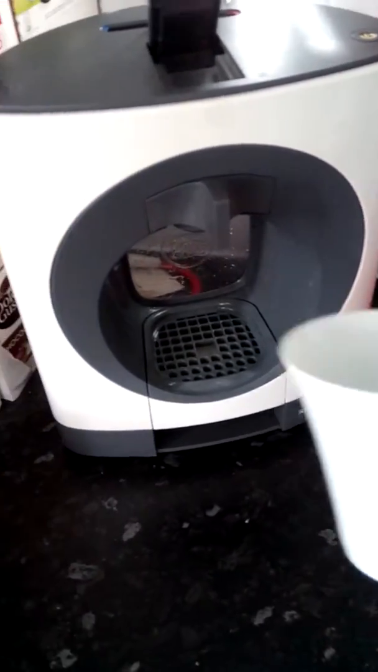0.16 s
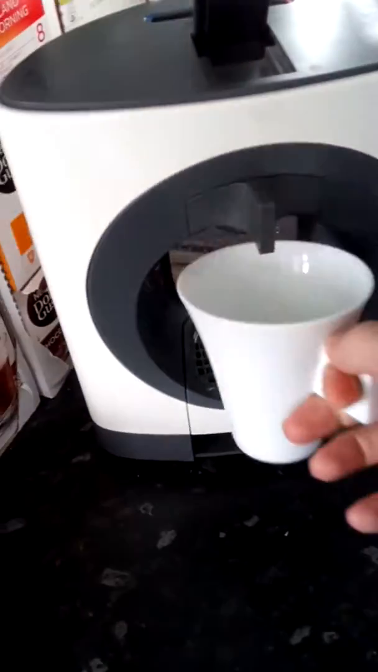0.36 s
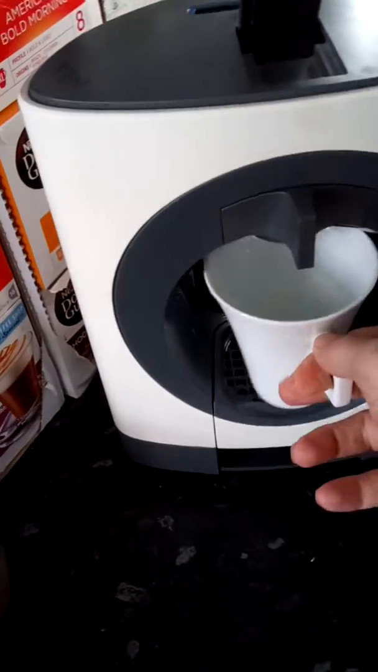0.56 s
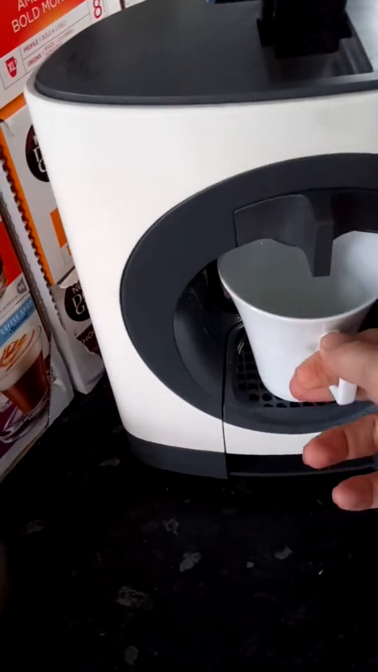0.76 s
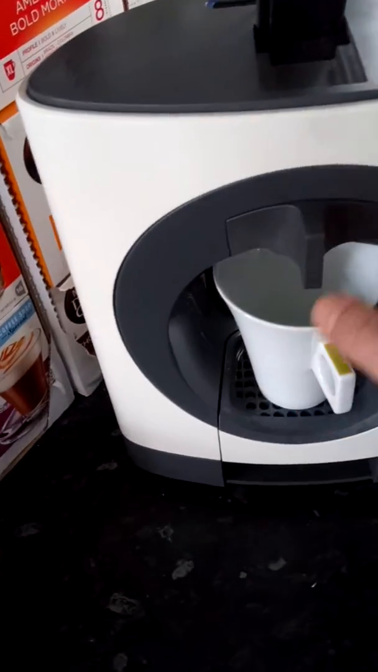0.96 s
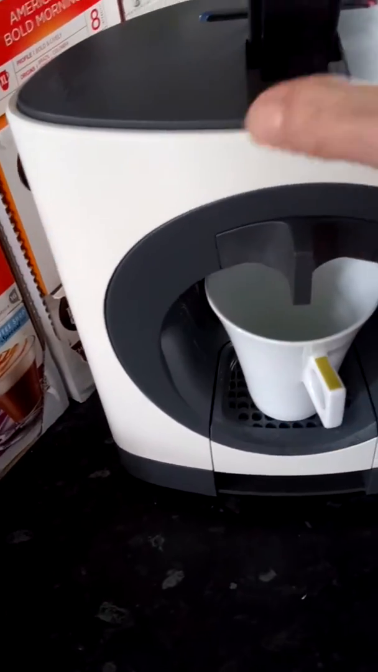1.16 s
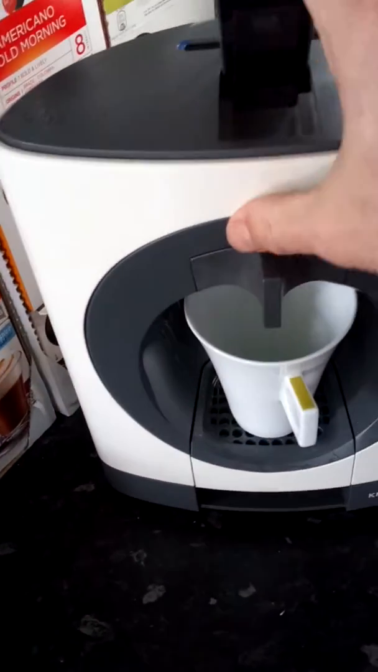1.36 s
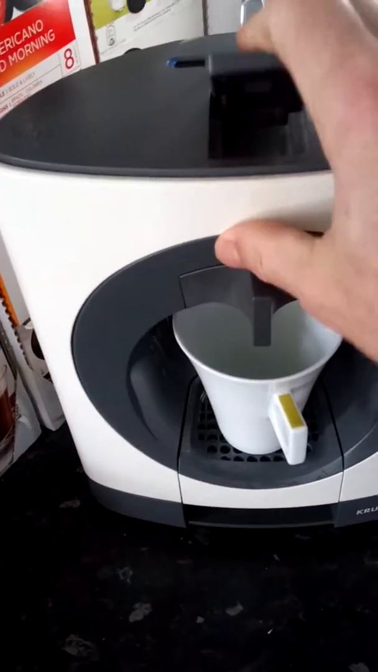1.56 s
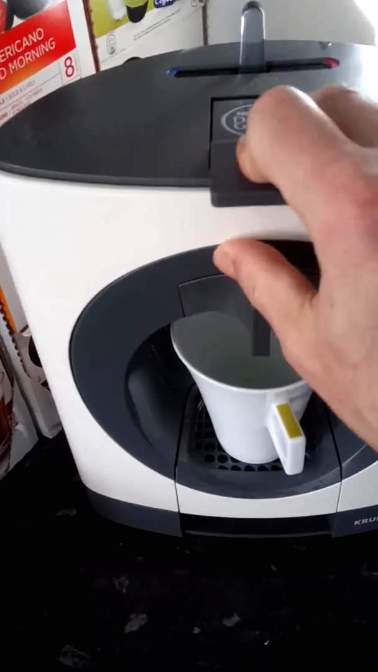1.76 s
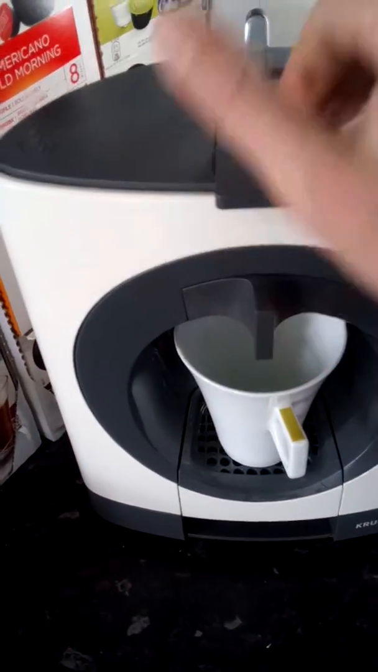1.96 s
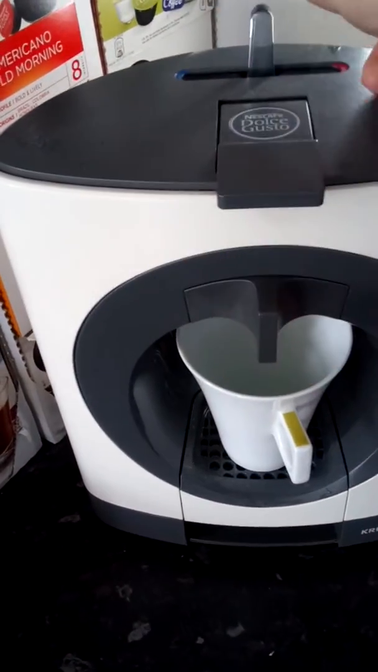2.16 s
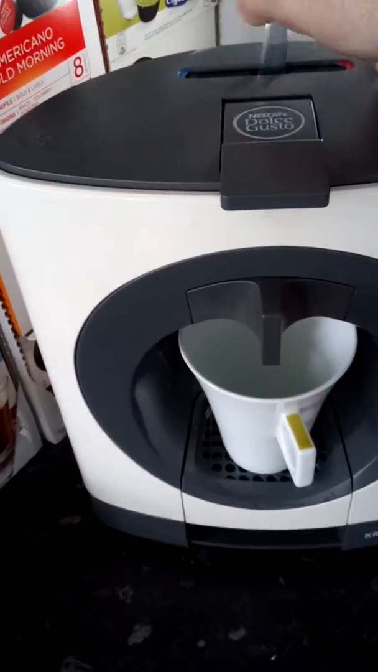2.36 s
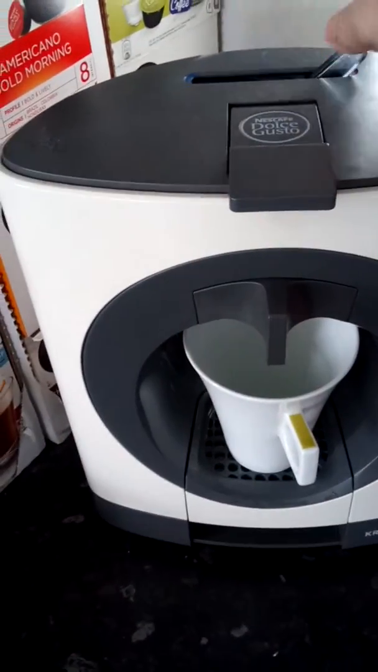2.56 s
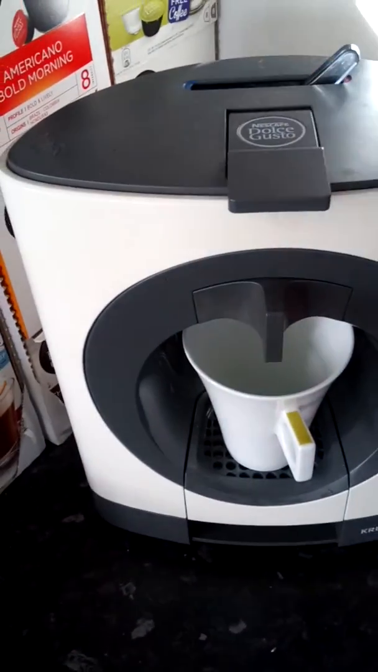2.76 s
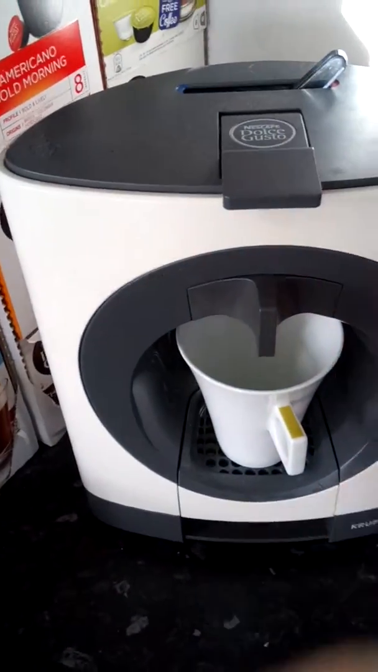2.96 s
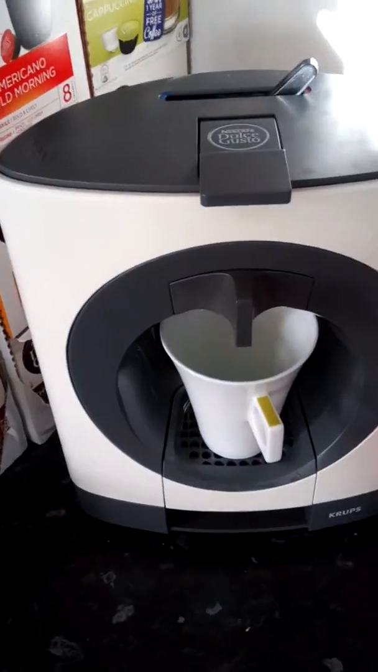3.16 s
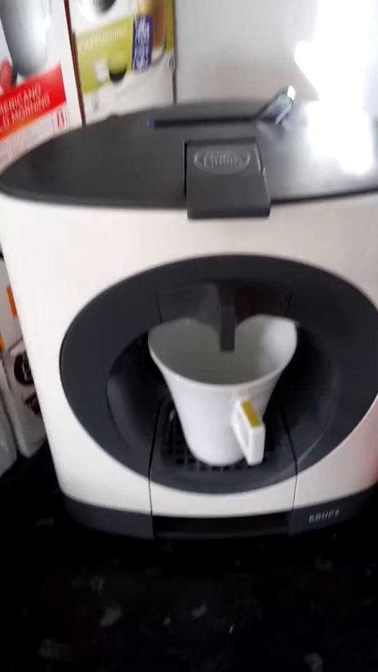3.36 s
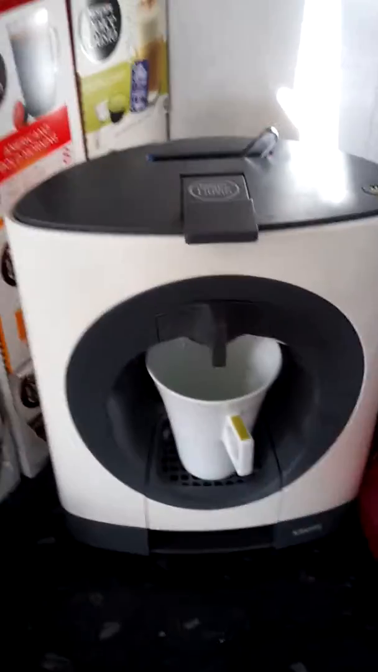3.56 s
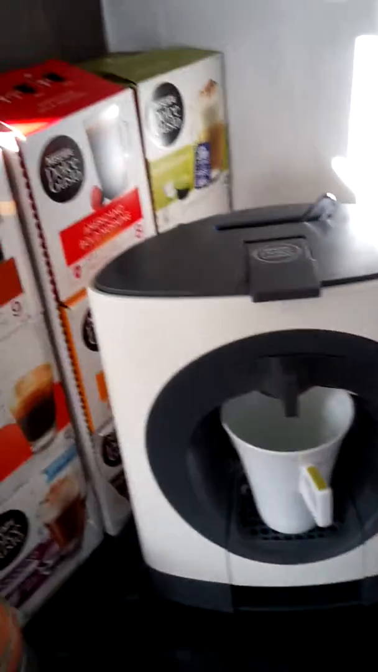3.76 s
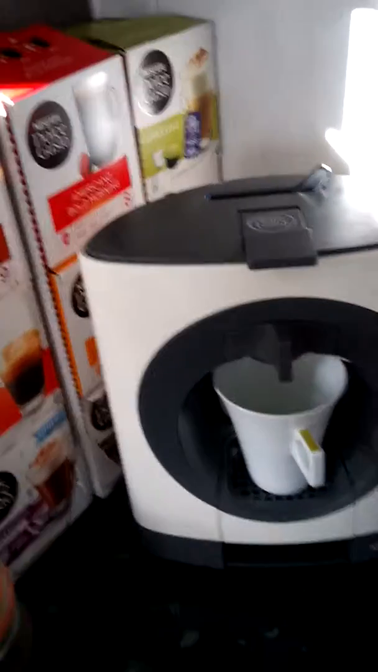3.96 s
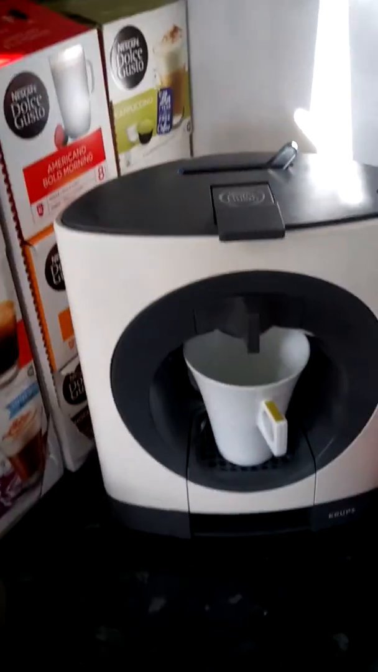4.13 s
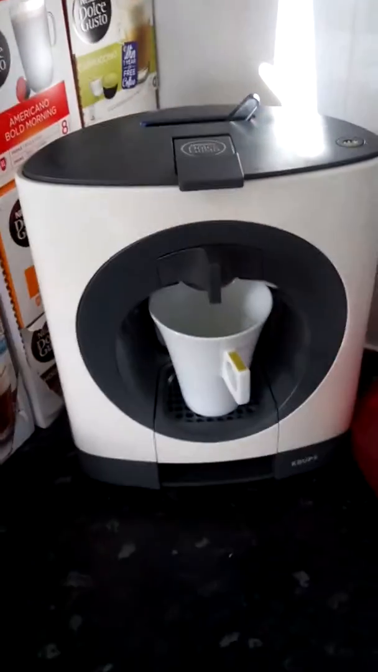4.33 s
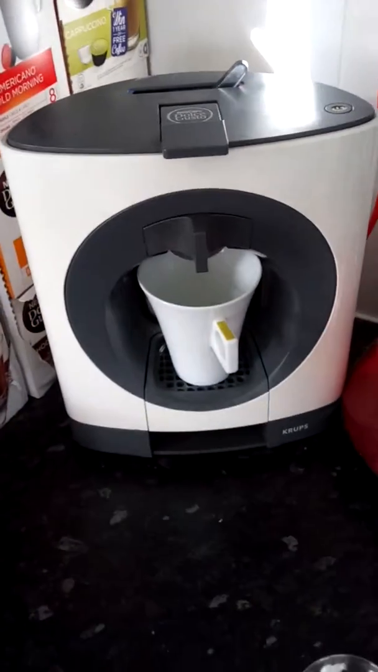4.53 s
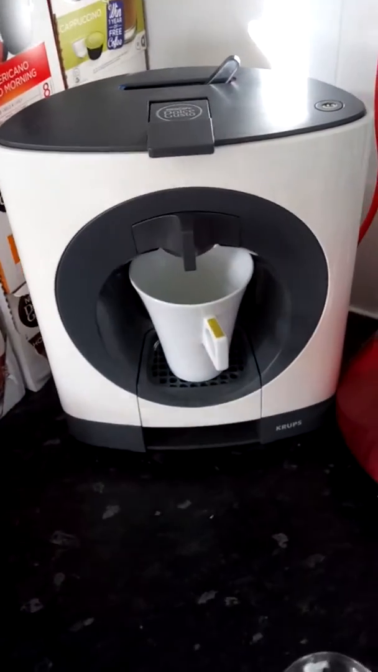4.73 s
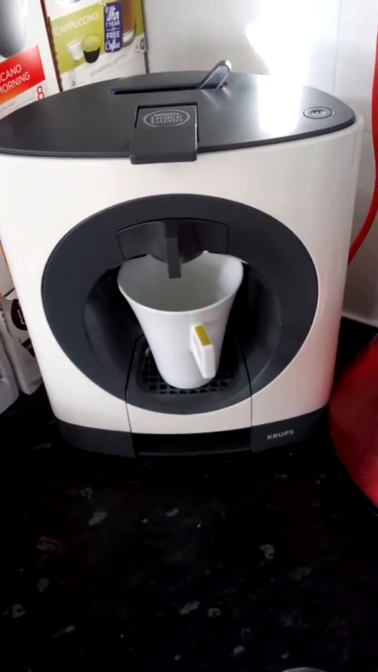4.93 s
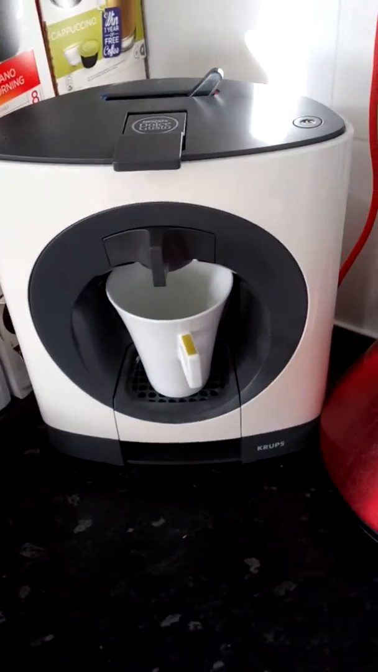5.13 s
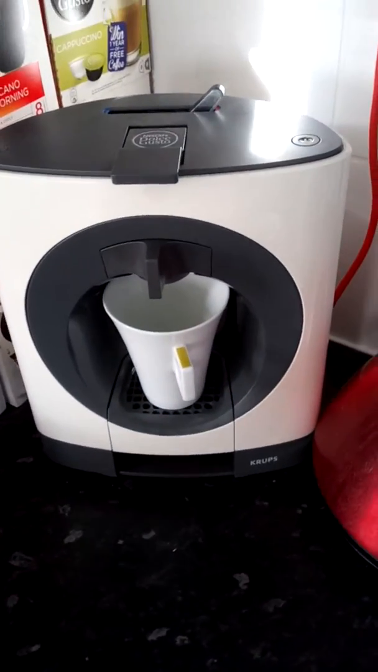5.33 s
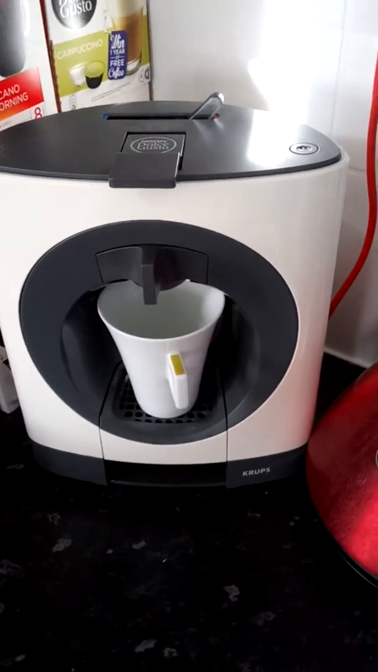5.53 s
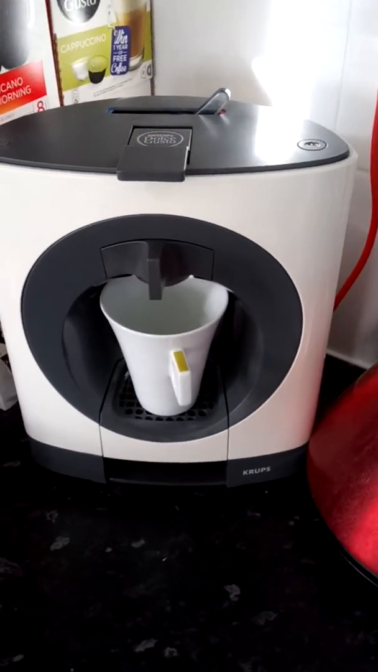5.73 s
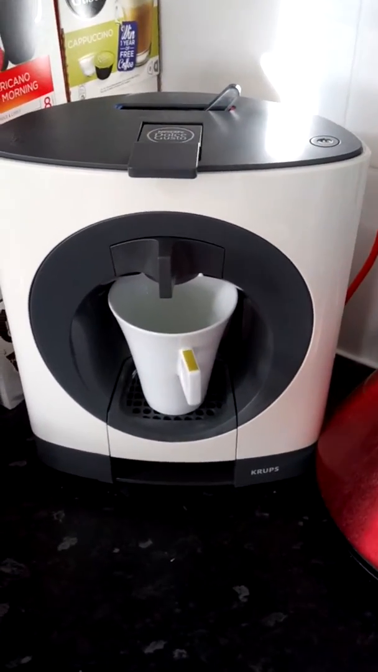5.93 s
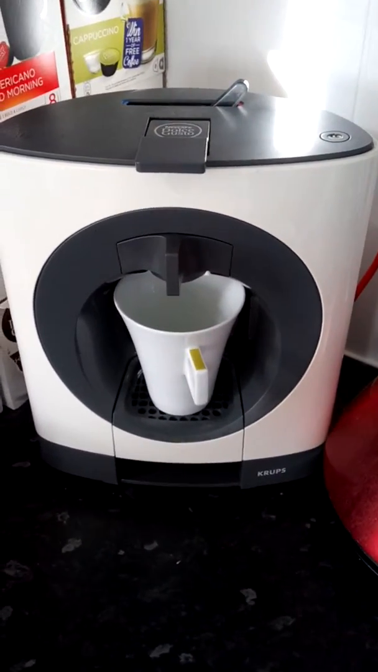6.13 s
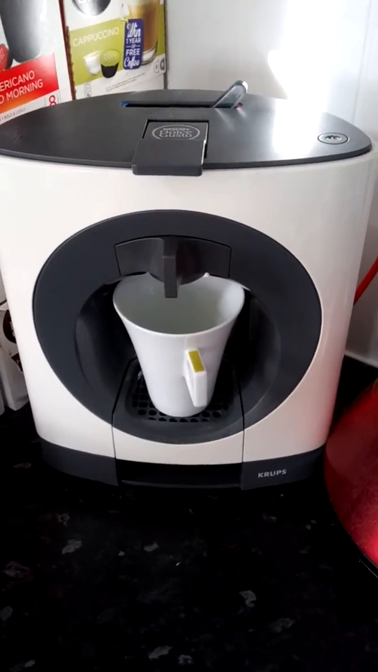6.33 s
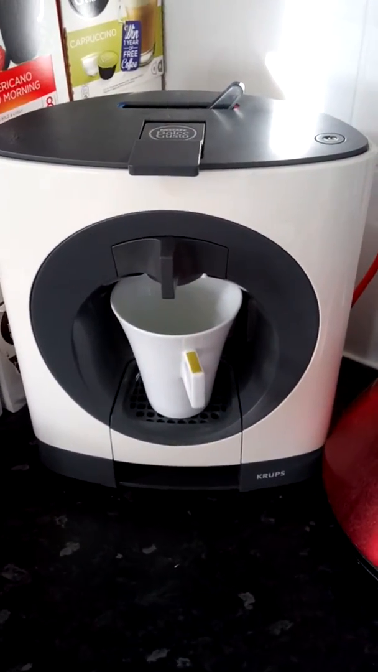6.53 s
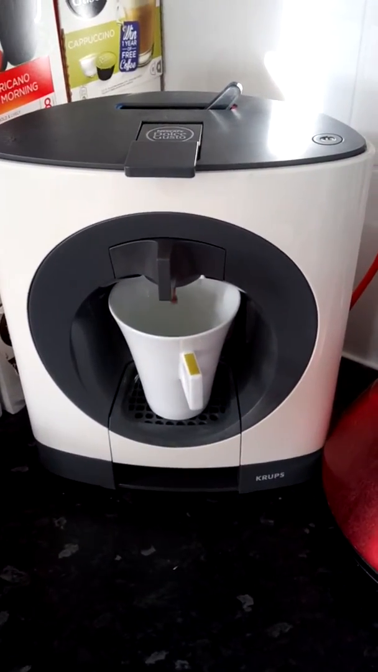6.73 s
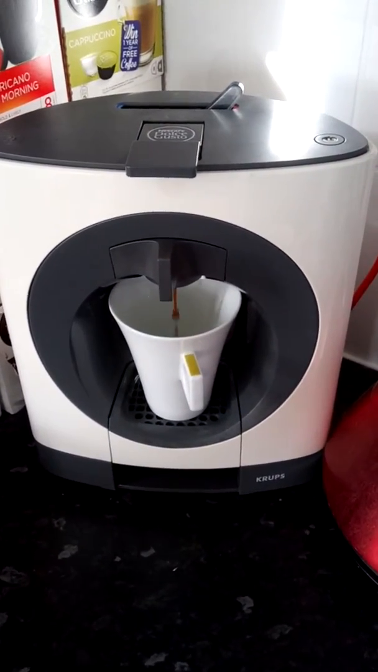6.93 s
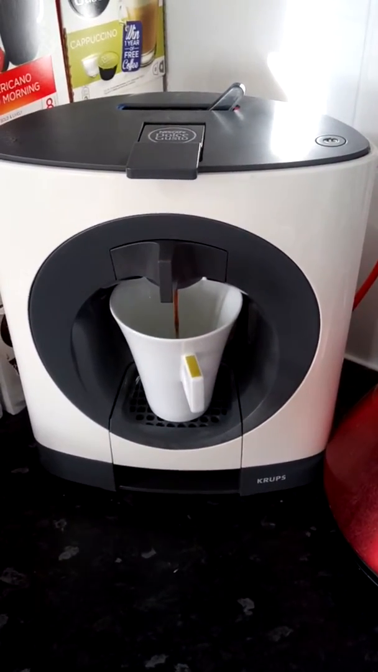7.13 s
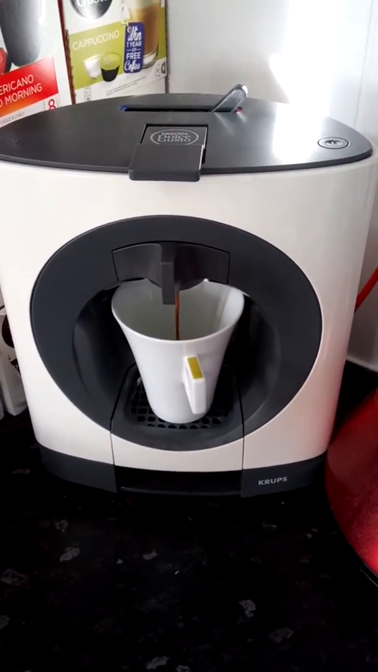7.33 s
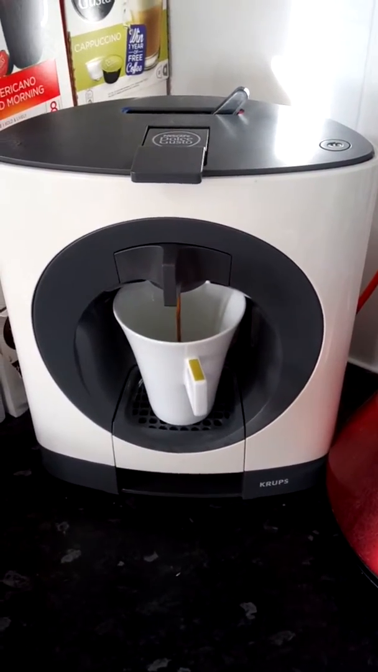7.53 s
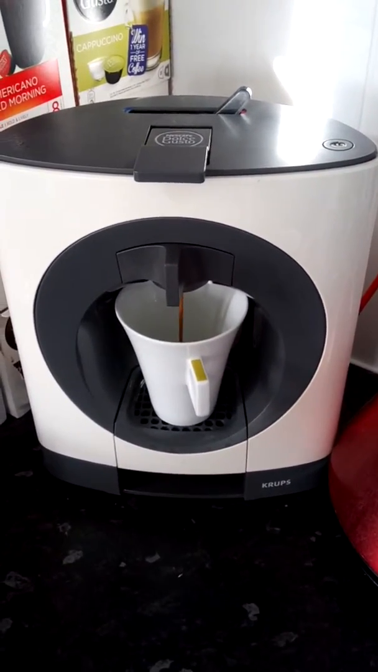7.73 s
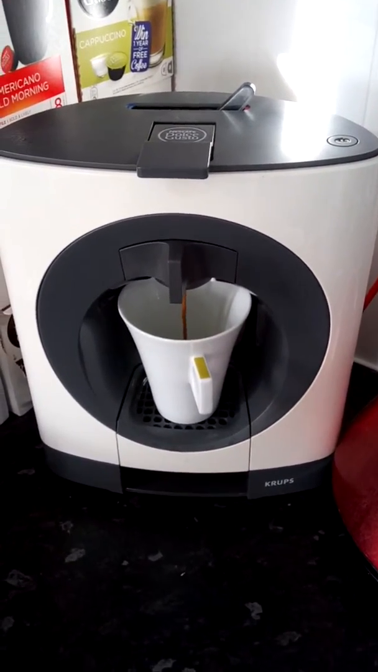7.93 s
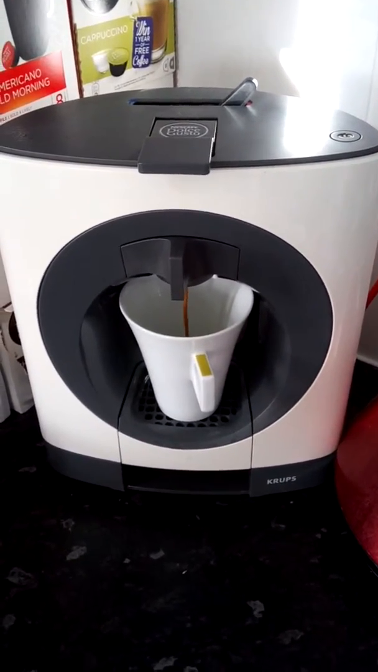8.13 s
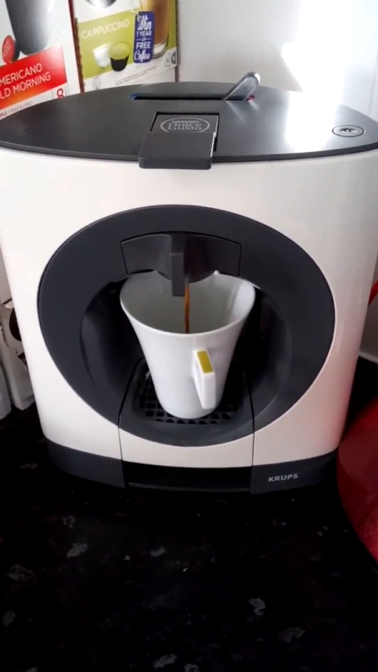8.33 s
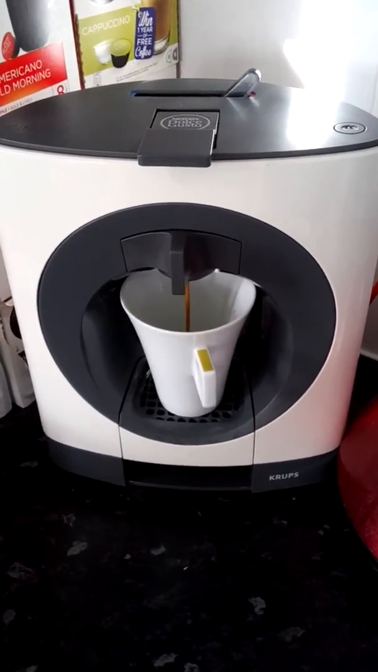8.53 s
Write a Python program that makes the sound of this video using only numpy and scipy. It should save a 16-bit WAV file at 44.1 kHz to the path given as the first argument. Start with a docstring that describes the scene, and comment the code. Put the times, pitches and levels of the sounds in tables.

```python
"""In a small hard kitchen a capsule coffee machine's pump hums and rattles: one piston stroke every 20 ms.
Hum is a stack of cosines, rattle is noise in bursts, the piston's stop is a set of struck resonators.
Water is a noise rush and wobbling tones. Before the pump, a cup is set on the drip tray, the head is latched
and the lever pushed over: dying noise bursts with a room tail. Ticks, drips and a quiet noise bed join in.
A phone microphone with a look-ahead limiter listens close by."""
import sys
import numpy as np
from scipy import signal
from scipy.fft import rfft, irfft, next_fast_len
from scipy.io import wavfile
from scipy.ndimage import minimum_filter1d

SR = 44100
rng = np.random.default_rng(int(sys.argv[2]) if len(sys.argv) > 2 else 0)


def dump(signal):
    """Clip the signal to [-1, 1] and save it as 16-bit WAV at the path in sys.argv[1]."""
    limited = np.clip(np.atleast_2d(signal).T, -1, 1)
    pcm = np.round(limited * 32767).astype(np.int16)
    wavfile.write(sys.argv[1], SR, pcm)


N = 383229

# All levels here come before the limiter. Spectra are relative: their noise is scaled to unit rms.
# "By stage" means four values: filling, pressing, soaking, pouring; the sound glides between them.
# The brew's progress: time_s, stage (0 filling, 1 pressing, 2 soaking, 3 pouring)
BREW = [(2.62, 0.011), (3.0, 0.047), (3.4, 0.076), (3.8, 0.49), (4.2, 0.96), (4.7, 1.27), (5.1, 1.38),
        (5.6, 2.13), (6.3, 2.1), (6.9, 3), (8.69, 3.4)]
STROKE_HZ, FIRST_STROKE_S = 50.0, 2.6185
RUN_UP_S = 0.02   # the housing takes a few strokes to swing fully

# Housing hum, one row for each multiple 2 to 15 of the stroke rate:
# filling_db, pressing_db, soaking_db, pouring_db
HUM_BY_STAGE = [(-46.5, -41, -35.5, -36), (-31, -34, -37.5, -37), (-47.5, -42, -41, -52),
                (-39.5, -32.5, -37.5, -44), (-56, -54.5, -52, -60), (-42.5, -42.5, -41.5, -43),
                (-43.5, -47, -47.5, -48.5), (-62, -64, -49.5, -45), (-42, -43, -45.5, -44),
                (-57, -46.5, -40.5, -50), (-46.5, -56, -57, -87), (-47.5, -55.5, -48.5, -43),
                (-46, -44, -55.5, -53), (-61, -54, -50.5, -50.5)]
# Hum on the multiples above 15: pitch_hz, level_db
BUZZ = [(800, -54), (1050, -53.5), (1250, -54), (1400, -55), (1650, -66), (1950, -60.5), (2150, -58),
        (2300, -56)]
# Buzz added by stage: level_db
BUZZ_DB = [-4, 3.5, -7, -0.5]
# Odd over even multiples of the buzz, by stage: difference_db
ODD_DB = [-3, 7.5, 20, 2]
# A loose panel sings on the 22nd multiple: time_s, level_db
PANEL = [(2.62, -63), (3.0, -51.5), (3.5, -43.5), (4.0, -45.5), (4.6, -46), (5.2, -35.5), (5.45, -44.5),
         (5.65, -57), (6.2, -48), (7.2, -49), (8.69, -53.5)]

# Rattle level: time_s, shell_db, tinny_db, fizz_db
RATTLING = [(2.62, -36, -43, -53), (2.72, -44.5, -48, -55), (2.9, -46.5, -50, -53.5), (3.2, -44, -51, -55),
            (3.38, -41, -50.5, -53), (3.55, -39.5, -46.5, -68), (3.65, -44, -44, -56),
            (4.08, -40, -38.5, -51), (4.3, -39, -42.5, -60), (5.22, -38.5, -44.5, -55),
            (5.58, -42, -51, -74), (5.72, -43.5, -56, -77), (5.8, -41.5, -53, -59),
            (5.97, -43.5, -56.5, -82), (6.3, -42, -54.5, -76), (6.45, -40.5, -49.5, -70),
            (7.1, -41, -44, -63), (7.74, -41.5, -46, -70), (8.1, -41, -49.5, -71), (8.69, -42, -52.5, -74)]
# Colour of the steady rattle: pitch_hz, level_db (per Hz)
RATTLE = [(1000, -29), (1800, -2.5), (2200, -1), (2900, -9), (3700, -2.5), (6800, 1.5), (7600, -17),
          (9500, -16), (13000, -48)]
# Peaks and dips of the loose parts: pitch_hz, width_hz, change_db
RATTLE_MODES = [(3630, 73, 4), (4370, 73, 4), (5300, 250, 0), (6270, 280, 3.5), (2200, 280, -3.5)]
# Colour of the rattle struck by the stroke: pitch_hz, level_db (per Hz)
BURST = [(1000, -28), (2200, -11.5), (3000, -10), (4000, -8), (5500, 5.5), (6900, 2), (7600, -3.5),
         (9500, -23.5), (13000, -40)]
# Colour of the fizz and of the capsule's hiss: pitch_hz, level_db (per Hz)
TOP = [(7000, -14), (8500, -3.5), (11000, -7), (13500, -7), (15200, 8.5), (15800, -3), (16100, -28),
       (17000, -60)]
# Share of the rattle that comes with the stroke, by stage: share (0 to 1)
IN_STROKE = [0.3, 0.61, 0.33, 0.34]
STROKE_HOLD_S, STROKE_DECAY_S = 0.0013, 0.0033
RETURN_AT_S, RETURN_DB = 0.0125, -10   # the piston's way back, after and against the stroke
REPEAT_SHARE, STRUCK_REPEAT = 0.17, 0.85   # power that repeats: in the steady rattle, in the struck one

# The piston's stop and the parts around it:
# pitch_hz, t60_s, filling_db, pressing_db, soaking_db, pouring_db
PISTON = [(1250, 0.018, -10, -3, -12, -11), (2094, 0.025, -20, -10.5, -12, -14),
          (3750, 0.03, -16, -7, -16, -5), (4530, .025, -2, -22, -20, -18),
          (5800, 0.029, -14, -10, -21, -13), (6610, 0.047, -9.5, -5.5, -18, -25),
          (6460, 0.0045, -1, -4.5, -8, -7.5)]
# Piston over the tinny rattle, by stage: level_db
PISTON_DB = [14, 13.3, 16, 13.9]
PISTON_AT_S = 0.0004   # after the stroke begins

# Colour of the rush in the pipes: pitch_hz, level_db (per Hz)
RUSH = [(25, -8), (60, 1), (130, -13), (300, 6), (600, 2.5), (1150, 4.5), (1600, -4), (2300, -6),
        (4000, -37)]
# Rush, by stage: level_db
RUSH_DB = [-39, -51, -43.5, -47]
# Gurgle, by stage: level_db
GURGLE_DB = [-55.5, -50, -52, -41.5]
# Lower gurgle tone, by stage: pitch_hz
GURGLE_HZ = [496, 598.3, 587, 688]
GULP_DB, GULP_S = 21.5, 0.19   # the first water gurgles louder

# Knocks, three tables with the same columns: start_s, level_db (before colour and halving),
# thud_db (added low down), edge_db (added high up), contact_s (fall time, longer in low bands),
# room_db (tail against the direct knock)
CUP_SET_DOWN = [(0.401, -2.5, 1, -5, 0.021, -14.5), (0.515, -30, 21.5, -3.5, 0.017, -17),
                (0.568, -40, 37.5, 1.5, 0.043, -8.5), (0.617, -7, 2.5, 3.5, 0.066, -15.5),
                (0.666, -20, 11.5, -17, 0.042, -13.5), (0.686, -37, 23, -3, 0.018, -8)]
LATCHES = [(1.526, 2, -23, 15.5, 0.016, -17), (1.73, 3, 4, 2, 0.06, -10.5),
           (2.475, -22.5, 11.5, -5, 0.1, -11)]
TOUCHES = [(0.122, -53, -6, 0.5, 0.037, 0), (0.859, -62.5, 26, 4, 0.033, -1.5),
           (1.275, -52, 22, -5, .05, -5.5), (1.319, -46, 3, -13, .04, -14),
           (1.349, -42.5, 6.5, -4, 0.036, -2), (1.391, -41, -18, -0.5, .025, 2.5),
           (1.984, -46, 10, 3, .04, -9), (2.085, -41.5, -1, -1, .04, -9), (2.143, -37.5, 0, 3.5, 0.06, -10),
           (2.325, -35.5, 0.5, -9.5, 0.084, -5), (2.388, -36.5, 6, -7, 0.041, -12),
           (2.426, -27, -4, -3, .03, -7), (2.467, -26.5, -1, 5, 0.087, -22)]
# Bands of a knock: low_hz, high_hz
KNOCK_BANDS = [(80, 290), (270, 1600), (1200, 2800), (2350, 6900), (6900, 14300), (13800, 16600)]
# The kitchen's dying time in each band: t60_s
ROOM_T60 = [0.46, 0.38, 0.35, 0.32, 0.19, 0.2]
# How far the thud reaches each band: share
THUD_SHARE = [0.99, 0.61, 0, 0.24, 0.37, 0.36]
# How far the edge reaches each band: share
EDGE_SHARE = [0.36, 0, 0, 0.93, 0.52, .7]
# Colour of the hard cup in each band: level_db
HARD_DB = [-15, -1, 0, -3.5, -23, -23]
# Colour of the latches in each band: level_db
LATCH_DB = [-13, -2, 0.5, -4.5, -19.5, -22]
# Colour of the fingers in each band: level_db
FINGER_DB = [-4.5, 2.5, -1.5, -3.5, -29, -23]
# Shared tone colour of all knocks: pitch_hz, width_hz, change_db
KNOCK_COLOUR = [(214, 31, -3.5), (577, 280, 2.5), (1070, 790, -4), (1600, 130, 4.5), (2460, 910, -4),
                (3520, 400, 4.5), (5500, 190, 0.5), (7840, 710, 0.5)]
# Cup wall, then tray: pitch_hz, level_db (against the knock), t60_s
CUP_RING = [(2160, -24, 0.71), (104, -26.5, 0.4)]
CUP_STANDS_S = 0.59   # standing on the tray damps the wall

# Dry ticks close to the microphone: start_s, level_db, speed_hz (higher means a quicker swing)
TICKS = [(3.0847, 0.5, 1540), (3.2844, -8.5, 2500)]
CAPSULE_S = 5.2527   # the capsule's foil gives way
# Pops of the foil: pitch_hz, level_db (at the start), t60_s
CAPSULE = [(1910, -26.5, 0.2), (2740, -22, .035), (3530, -27, .03), (4560, -34, .03), (5350, -27, 0.15),
           (5920, -27, 0.11), (14000, -20, 0.027)]
CAPSULE_HISS_DB, CAPSULE_HISS_T60_S = -34, 0.23
# Drips and pops at the spout: start_s, level_db (at the start), pitch_hz
DRIPS = [(6.36, -30, 2270), (6.4027, -28, 3400), (6.47, -27.5, 3370), (6.48, -34, 1954), (7.60, -35, 3400),
         (8.00, -33, 1870), (8.1895, -30, 1690), (8.22, -36, 2630), (8.404, -28.5, 1709)]
DRIP_T60_S = 0.045

# Colour of the quiet background: pitch_hz, level_db (per Hz)
QUIET = [(18, -33), (30, -14), (118, 2.5), (406, -14), (502, -6.5), (895, -15.5), (1020, -9.5), (2190, -25),
         (4230, -28), (12800, -54.5), (15000, -45), (16200, -53)]
# Hand and sleeve moving about: time_s, level_db (added to QUIET_DB)
QUIET_SWELL = [(0, -9), (.4, -8.5), (.8, -3.5), (1.05, -2), (1.25, -5.5), (1.3, 3), (1.45, 2.5), (2, 1),
               (2.25, -3), (2.35, -1), (2.6, 1)]
QUIET_DB = -51.5

LIMIT_DB, LIMIT_SLOPE = -13, 0.67   # where limiting begins; dB cut for each dB above that
RELEASE_DB_S, ATTACK_S, AHEAD_S = 156, 0.0044, 0.0095
CUTOFF_HZ = 16900   # from here up the sound is at least 70 dB down


def pump():
    """The stroke drives hum, water, piston clicks and rattle, which all start together."""
    t = np.arange(N) / SR - FIRST_STROKE_S
    shell_db, tinny_db, fizz_db = in_time(RATTLING)
    run_up = 1 - np.exp(-(t + 0.01).clip(0) / RUN_UP_S)
    out = run_up * hum(2 * np.pi * STROKE_HZ * t)
    out += water(t)
    out += from_db(tinny_db + by_stage(PISTON_DB)) * piston()
    out += rattle(t, shell_db, tinny_db, fizz_db, np.clip(by_stage(IN_STROKE), 0, 1))
    fade_in = np.clip((t + 0.012) / 0.0066, 0, 1)
    return out * fade_in


def hum(phase):
    """The housing swings at multiples of the stroke rate; higher ones wander more in level and timing."""
    step = 6   # the hum stays low enough to compute only every sixth sample
    levels = {k: by_stage(dbs)[::step] for k, dbs in enumerate(HUM_BY_STAGE, 2)}
    buzz_db, odd_db = by_stage(BUZZ_DB)[::step], by_stage(ODD_DB)[::step]
    shakes = [drift(9)[::step] for _ in range(4)]
    out = 0
    for k in range(2, 47):
        wander = min((k - 1) / 15.0, 1) * drift(1.0)[::step]
        high_db = at_hz(BUZZ, k * STROKE_HZ) + buzz_db + odd_db * (k % 2 - 0.5)
        db = levels.get(k, high_db)
        # strokes differ, so each tone has a rough skirt around it
        uneven = phase[::step] - 0.45 + 0.002 * shakes[k % len(shakes)]
        # multiples 2 to 5 dip together just after the stroke; the rest are turned by chance
        turn = 1.75 * rng.normal() * (k > 5)
        tone = np.cos(k * uneven + turn + 0.39 * wander)
        out = out - np.sqrt(2) * from_db(db + 1.75 * wander) * tone
    panel = np.sqrt(2) * from_db(in_time(PANEL)[0]) * np.cos(22 * phase + 0.22 * drift(11.1))
    return signal.resample_poly(out, step, 1)[:N] + panel


def rattle(t, shell_db, tinny_db, fizz_db, in_stroke):
    """Loose parts buzz all the time and burst at each stroke, more weakly at the return."""
    since = t % (1 / STROKE_HZ)
    stroke = np.floor(t * STROKE_HZ).astype(int).clip(0)
    force = from_db(0.23 * rng.standard_normal((stroke.max() + 1, 2)))[stroke]
    rise = 1 - np.exp(-since / 0.0011)
    burst = force[:, 0] * np.exp(-(since - STROKE_HOLD_S).clip(0) / STROKE_DECAY_S) * rise
    back = since - RETURN_AT_S
    burst += force[:, 1] * from_db(RETURN_DB) * (back > 0) * np.exp(-back.clip(0) / STROKE_DECAY_S)
    burst = rms_one(burst)

    # contacts that repeat stroke after stroke and slowly shift
    patterns = rng.standard_normal((3, round(SR / STROKE_HZ)))
    same = rms_one(sum(np.resize(p, N) * np.cos(k + 0.5 * drift(0.84)) for k, p in enumerate(patterns)))
    contacts = np.sqrt(REPEAT_SHARE) * same + np.sqrt(1 - REPEAT_SHARE) * rng.standard_normal(N)
    steady = np.sqrt(1 - in_stroke) * colour(contacts, RATTLE, RATTLE_MODES)

    # the same patterns, in step with the stroke, in the slowly shifting mix from one second earlier
    hits = np.sqrt(STRUCK_REPEAT) * np.roll(same, SR)
    hits = hits + np.sqrt(1 - STRUCK_REPEAT) * rng.standard_normal(N)
    struck = np.sqrt(in_stroke) * colour(hits * burst, BURST, RATTLE_MODES)

    # split into a dull shell and a tinny rest
    both = steady + struck
    shell = signal.sosfiltfilt(signal.butter(3, 4800, fs=SR, output="sos"), both)
    out = from_db(shell_db) * rms_one(shell) + from_db(tinny_db) * rms_one(both - shell)
    gate = np.sqrt(in_stroke * burst ** 2 + 1 - in_stroke) ** 1.24
    fizz = colour(rng.standard_normal(N) * gate, TOP)
    return out + from_db(fizz_db) * fizz


def piston():
    """One hard click a stroke rings the metal stop and parts around it, each a two-pole resonator."""
    s = np.arange(FIRST_STROKE_S + PISTON_AT_S, N / SR - 0.01, 1 / STROKE_HZ)
    chance = rng.standard_normal((500, 8))[:len(s)]
    at = ((s + 0.00012 * chance[:, -1]) * SR).astype(int)   # click times vary a little
    out = np.zeros(N)
    for k, (hz, t60, *dbs) in enumerate(PISTON):
        db = by_stage(dbs)[(s * SR).astype(int)]
        clicks = np.zeros(N)
        clicks[at] = from_db(db + 1.5 * chance[:, k])
        r, w = from_db(-60 / (t60 * SR)), 2 * np.pi * hz / SR
        out += signal.lfilter([0, np.sin(w)], [1, -2 * r * np.cos(w), r * r], clicks + 1e-18)
    return out


def water(t):
    """A noise rush in the pipes and a lumpy gurgle: two hollow tones with randomly changing strength."""
    turn = 2 * np.pi * np.cumsum(by_stage(GURGLE_HZ)) / SR
    gurgle = drift(97) * np.cos(turn) + 0.76 * drift(115) * np.cos(1.6 * turn)
    gurgle_db = by_stage(GURGLE_DB) + GULP_DB * np.exp(-(t / GULP_S) ** 2)
    rush = colour(rng.standard_normal(N), RUSH)
    rush = from_db(by_stage(RUSH_DB) + 0.69 * drift(17)) * rush
    return rush + from_db(gurgle_db + 1.9 * drift(3.9)) * gurgle


def knocks(table, colour_db):
    """Each knock is a dying burst of contact noise, then the kitchen's tail swells and dies band by band."""
    out, t = np.zeros(N), np.arange(SR // 2) / SR
    for s, db, thud_db, edge_db, contact, room_db in table:
        bands_db = db + np.array(colour_db)
        bands_db = bands_db + thud_db * np.array(THUD_SHARE) + edge_db * np.array(EDGE_SHARE)
        for (low_hz, high_hz), t60, band_db in zip(KNOCK_BANDS, ROOM_T60, bands_db):
            direct = from_db(-60 * t / (contact + 10.0 / low_hz)) * np.minimum(t / 0.00037, 1)
            tail = from_db(room_db - 60 * t / t60) * (1 - np.exp(-t / 0.0022))
            noise = rng.standard_normal(len(t))
            part = rms_one(band(band(noise, low_hz, high_hz), low_hz, high_hz))   # twice, for steep edges
            add(out, s, from_db(band_db) * part * np.hypot(direct, tail) / 2)
    return out


def colour_knocks(x):
    """A chain of peak and dip filters colours every knock."""
    for hz, width_hz, db in KNOCK_COLOUR:
        g, w = from_db(db / 2), 2 * np.pi * hz / SR
        a = np.sin(w) * width_hz / hz / 2
        top = [1 + a * g, -2 * np.cos(w), 1 - a * g]
        bottom = [1 + a / g, -2 * np.cos(w), 1 - a / g]
        x = signal.lfilter(top, bottom, x + 1e-18)
    return x


def cup_ring():
    """The cup's wall sings as a dying sine until it stands; the tray thuds at every knock of the cup."""
    out, t = np.zeros(N), np.arange(SR // 2) / SR
    (wall_hz, wall_db, wall_t60), (tray_hz, tray_db, tray_t60) = CUP_RING
    for s, db, thud_db, *_ in CUP_SET_DOWN:
        damped = from_db(-900 * (s + t - CUP_STANDS_S).clip(0))   # falls 900 dB a second once standing
        wall = from_db(db + wall_db - 60 * t / wall_t60) * np.sin(2 * np.pi * wall_hz * t)
        add(out, s, (s < CUP_STANDS_S) * damped * wall)
        tray = from_db(db + thud_db + tray_db - 60 * t / tray_t60) * np.sin(2 * np.pi * tray_hz * t)
        add(out, s, tray)
    return out


def ticks():
    """Each dry tick is one quick swing of the pressure, down and then up."""
    out, t = np.zeros(N), np.arange(SR // 2) / SR
    for s, db, hz in TICKS:
        u = (t - 1 / hz) * hz * 5.6
        add(out, s, from_db(db) * u * np.exp(-u * u) * 2)
    return out


def capsule_and_drips():
    """The foil gives way with a hiss and pops, drips follow; each pop is a narrow, dying band of noise."""
    out, t = np.zeros(N), np.arange(SR // 2) / SR
    hiss = colour(rng.standard_normal(len(t)), TOP)
    add(out, CAPSULE_S, from_db(CAPSULE_HISS_DB - 60 * t / CAPSULE_HISS_T60_S) * hiss)
    pops = [(CAPSULE_S, db, hz, t60, 1.05) for hz, db, t60 in CAPSULE]
    pops += [(*drip, DRIP_T60_S, 1.13) for drip in DRIPS]
    for s, db, hz, t60, spread in pops:
        rough = band(rng.standard_normal(len(t)), hz / spread, hz * spread)
        add(out, s, from_db(db - 60 * t / t60) * rms_one(rough))
    return out


def quiet_background():
    """Soft shaped noise that swells while hand and sleeve move about."""
    level = from_db(QUIET_DB + in_time(QUIET_SWELL)[0])
    return level * colour(rng.standard_normal(N), QUIET)


def from_db(db):
    """Decibels to gain."""
    return np.exp(np.asarray(db, float) * np.log(10) / 20)


def rms_one(x):
    """Scale to unit rms, a measure of average strength."""
    return x / np.sqrt(np.mean(x ** 2) + 1e-20)


def in_time(rows):
    """Columns of a time table, joined by straight lines and read at every sample."""
    s, *columns = np.transpose(rows)
    return [np.interp(np.arange(N) / SR, s, c) for c in columns]


def by_stage(values):
    """A value given for each stage of the brew, read at every sample."""
    return np.interp(in_time(BREW)[0], range(len(values)), values)


def at_hz(points, hz):
    """A spectrum read between its points on a log pitch axis."""
    return np.interp(np.log(hz), np.log(np.array(points)[:, 0]), np.array(points)[:, 1])


def colour(x, spectrum, modes=()):
    """Noise shaped by a spectrum with bell-shaped peaks or dips on it; unit rms."""
    size = next_fast_len(len(x))
    hz = np.maximum(np.arange(size // 2 + 1) * SR / size, 1)
    db = at_hz(spectrum, hz) + sum(p * np.exp(-((hz - f) / w) ** 2) for f, w, p in modes)
    return rms_one(irfft(rfft(x, size) * from_db(db), size)[:len(x)])


def drift(rate):
    """Smoothed chance of spread 1, made at every 40th sample; a higher rate moves faster."""
    r = np.exp(-80 * np.pi * rate / SR)
    slow = signal.lfilter([1], [1, -2 * r, r * r], rng.standard_normal(N // 40 + 2002))[2000:]
    return np.interp(np.arange(N) / 40, np.arange(len(slow)), rms_one(slow))


def band(x, low_hz, high_hz):
    """Keep mainly the pitches between two limits."""
    return signal.sosfilt(signal.butter(3, [low_hz, high_hz], "band", fs=SR, output="sos"), x)


def add(out, s, piece):
    """Mix a short sound in at time s."""
    i = round(s * SR)
    out[i:i + len(piece)] += piece[:N - i]


def scene():
    """All sources in the kitchen, as one channel."""
    hits = knocks(CUP_SET_DOWN, HARD_DB) + knocks(LATCHES, LATCH_DB) + knocks(TOUCHES, FINGER_DB)
    hits = colour_knocks(hits) + cup_ring()
    background = quiet_background()
    return (hits + pump() + ticks() + capsule_and_drips() + background)[None]


def record(dry):
    """A limiter ducks just ahead of a peak and lets go steadily; the highest treble is cut."""
    over = np.maximum(20 * np.log10(np.abs(dry[0]) + 1e-9) - LIMIT_DB, 0) * LIMIT_SLOPE
    # the largest cut needed within the look-ahead time
    ahead = max(round(AHEAD_S * SR), 1)
    shifted = np.append(over[ahead // 2:], np.zeros(ahead // 2))
    over = -minimum_filter1d(-shifted, size=ahead)
    # the cut may fall only at the release speed
    ramp = RELEASE_DB_S * np.arange(N) / SR
    held = np.maximum.accumulate(over + ramp) - ramp
    r = np.exp(-1 / (ATTACK_S * SR))
    cut_db = signal.lfilter([1 - r], [1, -r], held)
    low_pass = signal.cheby2(12, 70, CUTOFF_HZ, fs=SR, output="sos")
    return signal.sosfilt(low_pass, dry * from_db(-cut_db))


dry = scene()
out = record(dry)
dump(out)
```